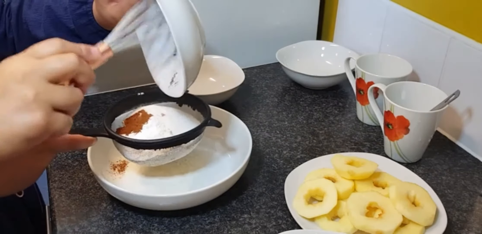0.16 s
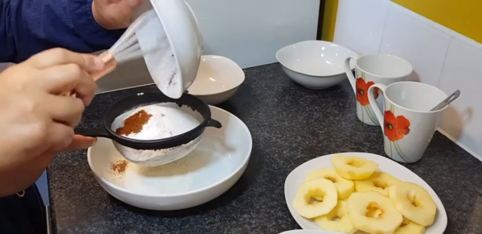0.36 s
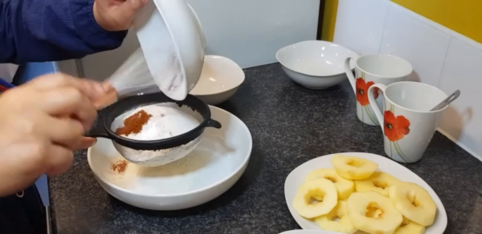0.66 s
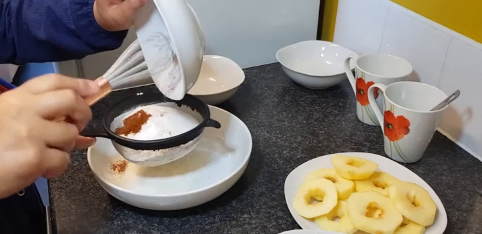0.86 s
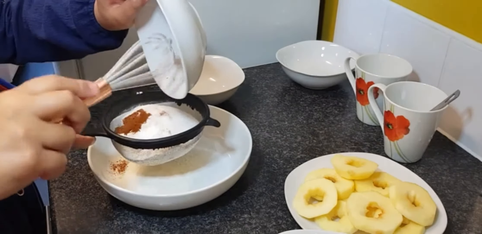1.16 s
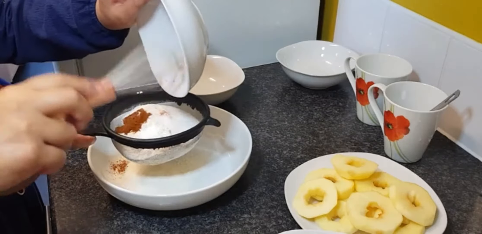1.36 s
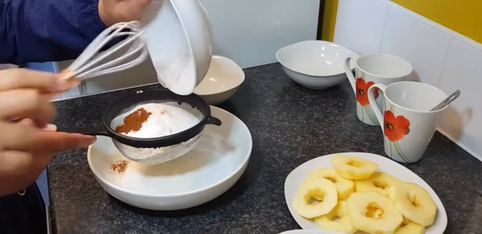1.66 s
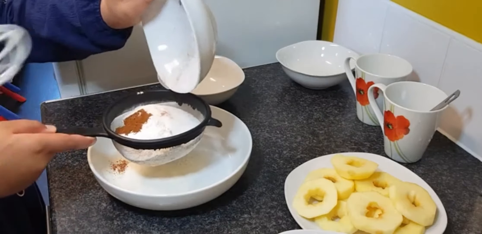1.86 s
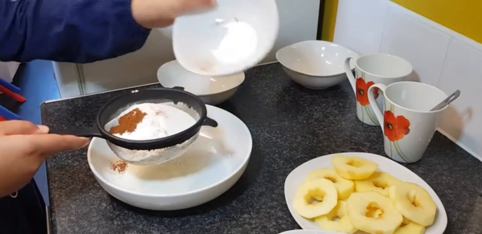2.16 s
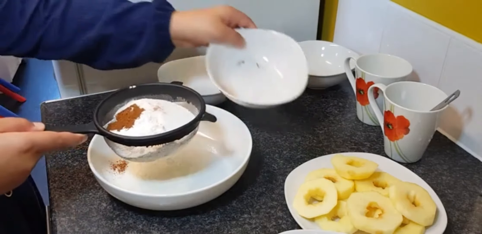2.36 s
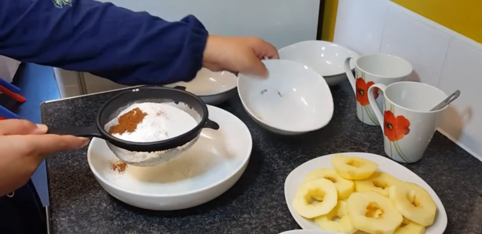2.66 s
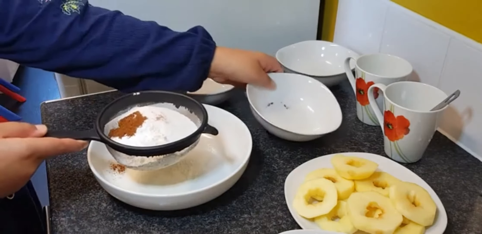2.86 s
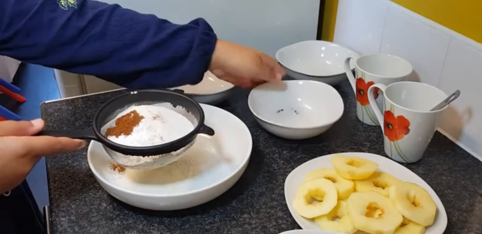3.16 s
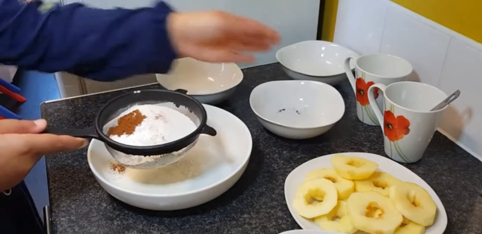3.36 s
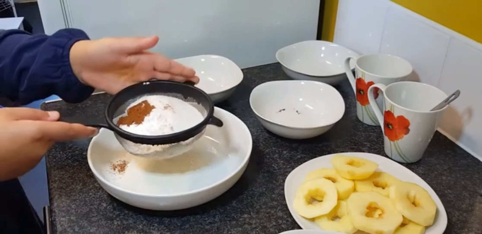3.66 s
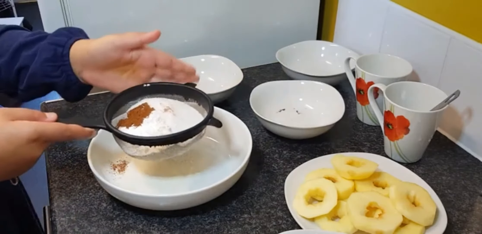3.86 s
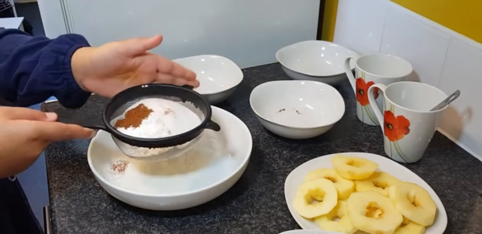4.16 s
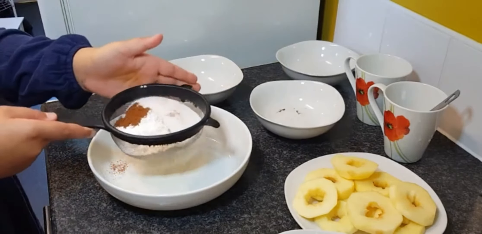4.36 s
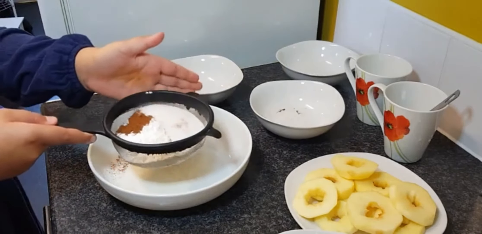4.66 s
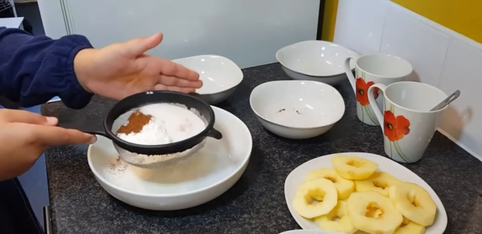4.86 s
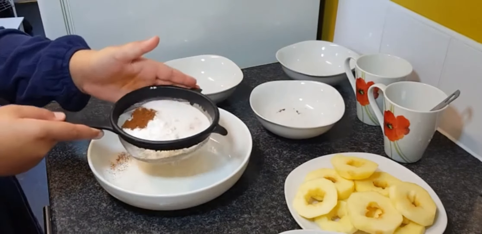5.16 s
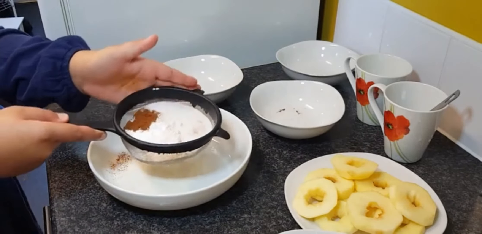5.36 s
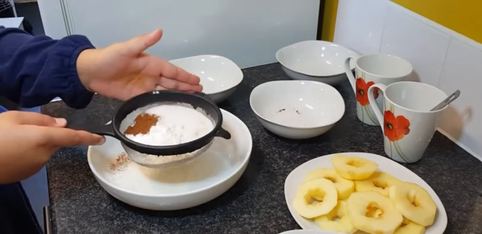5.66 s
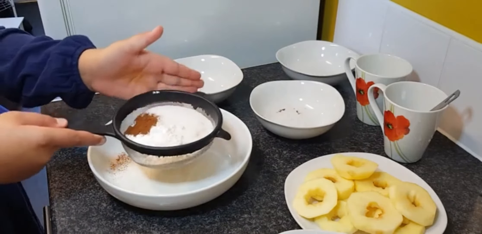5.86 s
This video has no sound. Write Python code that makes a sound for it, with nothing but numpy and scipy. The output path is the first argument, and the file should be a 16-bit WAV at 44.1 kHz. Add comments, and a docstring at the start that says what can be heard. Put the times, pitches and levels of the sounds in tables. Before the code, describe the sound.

A fan and appliances hum quietly and steadily in a tiled kitchen, heard through stereo microphones. From about 0.4 to 1.5 seconds a wire whisk taps a hand-held ceramic bowl eight times in quick, even succession, the first very faint. Each tap is a bright wiry rattle with a short, damped ring. At about 2.8 seconds the bowl meets the worktop with a loud knock, a little clatter and a low boom. Around 3.1 to 3.3 seconds it rocks to rest in three fast knocks and rings briefly, with a short room echo. The overall level dips slightly after the knocks. A faint low hum swells from 3.4 seconds and slowly fades. Between 4.3 and 6 seconds a hand softly pats a flour sieve five times, giving thin, high puffs of hiss that grow slightly stronger toward the end.

```python
"""Over the hum of a fan and appliances, a wire whisk taps a hand-held ceramic bowl eight times.
The bowl is set down on the worktop, which booms under one knock and a three-fold rock. A low hum
swells and fades, and a hand softly pats a flour sieve. Heard from a stereo pair of microphones in a
tiled kitchen; the recorder turns its gain down at the knocks and waits before it recovers."""
import sys
import numpy as np
from scipy import signal
from scipy.fft import rfft, irfft
from scipy.io import wavfile
from scipy.ndimage import uniform_filter1d, minimum_filter1d

SR = 44100
rng = np.random.default_rng(int(sys.argv[2]) if len(sys.argv) > 2 else 0)


def dump(signal):
    """Clip the signal to [-1, 1] and save it as 16-bit WAV at the path in sys.argv[1]."""
    limited = np.clip(np.atleast_2d(signal).T, -1, 1)
    pcm = np.round(limited * 32767).astype(np.int16)
    wavfile.write(sys.argv[1], SR, pcm)


N = 265482


def gain_of(db):
    """Turns dB into an amplitude factor."""
    return 10 ** (np.asarray(db) / 20)


def unit_rms(x):
    """Scales to rms 1."""
    return x / np.sqrt(np.mean(x ** 2) + 1e-20)


def curve_at(points, hz):
    """Reads (frequency, value) points on a log-frequency axis."""
    point_hz, value = np.transpose(points)
    return np.interp(np.log(hz + 1), np.log(point_hz + 1), value)


def add(mix, start_s, sound):
    """Mixes a sound in at its start time."""
    part = mix[..., round(start_s * SR):][..., :sound.shape[-1]]
    part += sound[..., :part.shape[-1]]


def mic_spectra(hz, frames):
    """Random spectra for two microphones that agree in the bass only."""
    # likeness of left and right: (frequency [Hz], correlation [-1..1])
    likeness = [(60, 0.89), (180, 0.96), (550, 0.56), (1650, 0.041), (4970, -0.11), (15000, 0.14)]
    alike = np.clip(curve_at(likeness, hz), -1, 1)[:, None]
    a, b, c, d = rng.standard_normal((frames, len(hz), 4)).T
    left, unrelated = a + 1j * b, c + 1j * d
    return np.array([left, alike * left + np.sqrt(1 - alike ** 2) * unrelated])


def burst(spectrum, rise_s, t60, tilt_db=0.):
    """Coloured noise that rises and dies away; the tilt is in dB per octave."""
    t, hz = np.arange(8192) / SR, np.fft.rfftfreq(8192, 1 / SR)
    colour = gain_of(curve_at(spectrum, hz) + tilt_db * np.log2(np.maximum(hz, 100) / 1000))
    noise = unit_rms(irfft(mic_spectra(hz, 1)[..., 0] * colour))
    return noise * (1 - np.exp(-t / rise_s)) * gain_of(-60 * t / t60)


def ring(modes, rise_s):
    """Modes build up and die away; the higher ones differ more in phase between the microphones."""
    hz, db, t60 = np.transpose(modes)[:, :, None]
    t = np.arange(round(min(1.2 * t60.max(), 1) * SR)) / SR
    common, apart = rng.uniform(-1, 1, (2, len(hz), 1))
    phase = np.pi * common + np.minimum(hz / 700, 1.15) * np.array([apart, -apart])
    swell = 1 - np.exp(-t / (rise_s + 0.13 / hz))
    return (swell * gain_of(db - 60 * t / t60) * np.sin(2 * np.pi * hz * t + phase)).sum(1)


def room_tone():
    """Fan and appliances resonate in a bed of drifting noise; a low drone swells and sinks."""
    # noise bed of the room: (frequency [Hz], relative density [dB])
    bed = [(20, -18), (62, -16), (130, -14.5), (280, -17), (560, -21), (1000, -27.5), (1300, -25),
           (2000, -21), (2400, -34), (3200, -35.5), (5000, -33), (7000, -31), (9200, -29.5), (12000, -30.5),
           (14000, -33.5), (15700, -32)]
    # fan and appliance resonances: (frequency [Hz], width [Hz], height over the bed [dB])
    hums = [(48, 10, 8), (175, 14, 8), (220, 14, 12), (345, 14, 11), (1430, 80, 5), (1630, 120, 9),
            (1900, 150, 8), (3500, 250, 9), (4150, 500, 10), (5600, 600, 4), (8200, 1200, 6),
            (14800, 600, 4), (6460, 140, 15), (9730, 70, 9), (10960, 220, 12), (15700, 80, 6)]
    # course of the drone near 100 Hz: (time [s], level [dB])
    drone_levels = [(0, -63), (.3, -51.5), (.85, -53), (1.0, -58), (2.699, -57), (3.75, -46), (4.2, -53.5),
                    (5.5, -52.5), (5.93, -49.5), (6.02, -51)]
    frames, hz = N // 1024 + 5, np.fft.rfftfreq(4096, 1 / SR)

    def noise(db):
        spectra = mic_spectra(hz, frames) * gain_of(db)
        return unit_rms(signal.istft(spectra, nperseg=4096, noverlap=3072)[1][:, :N])

    drift = uniform_filter1d(rng.standard_normal((frames, len(hz))), size=3, axis=0)
    patches_db = 1.8 * unit_rms(uniform_filter1d(drift, size=15, axis=1)).T
    hums_db = sum(db / (1 + (2 * (hz - centre) / width) ** 2) for centre, width, db in hums)
    air = noise((curve_at(bed, hz) + hums_db)[:, None] + patches_db)
    drone = noise(-3.0 * ((hz[:, None] - 101) / 7) ** 2)
    drone_db = np.interp(np.arange(N) / SR, *np.transpose(drone_levels))
    return gain_of(-49) * air + gain_of(drone_db) * drone


def wire_rattle(hard_db, rise_s, t60):
    """Wires land one by one, so the noise jumps in level; a harder tap is brighter."""
    # clash of the wires: (frequency [Hz], relative density [dB])
    spectrum = [(300, -38), (900, 1), (1500, -0.5), (2500, 3), (3300, -2.5), (4300, 0.5), (5500, -5.5),
                (7000, -8), (10000, -8), (15700, 0.5)]
    jumps = gain_of(4.5 * np.repeat(rng.standard_normal(128), 64))
    grain = unit_rms(uniform_filter1d(jumps, size=12))
    return burst(spectrum, rise_s, t60, tilt_db=0.056 * hard_db) * grain


def bowl_ring(family_db, grip_db_per_s, rise_s):
    """The ceramic rings and a gripping hand speeds its decay; families given no level stay silent."""
    # five mode families, low to high, the last from the foot:
    # (frequency [Hz], relative level [dB], t60 standing free [s])
    families = [
        [(1040, -6, .2), (1128, -4, .8), (1167, 0, 1.0)],
        [(2406, -3, .25), (2449, -4, .25), (2492, 0, .45), (2610, -6, .15), (2300, -8, .15)],
        [(4199, -3, .35), (4285, 0, .35), (4400, -8, .15), (4650, -12, .3)],
        [(6200, -3, .15), (6310, 0, .2)],
        [(9800, -2, .2), (9950, 0, .2), (10150, -2, .2)],
    ]
    modes = [(hz, db + lift_db, 60 / (60 / t60 + grip_db_per_s))
             for family, lift_db in zip(families, family_db) for hz, db, t60 in family]
    return ring(modes, rise_s)


def whisk_taps():
    """A first wire lands and the rest trail it; both rattle and ring the held bowl."""
    # whisk on bowl: (time [s], strength [dB], place [0 wall..1 rim], hardness [dB], trailing lag [s])
    taps = [(0.4078, -39.5, 0.5, -33, .005), (0.583, -25, 0.55, 1, 0.0053),
            (0.7511, -25, 0.36, -5.5, 0.0064), (0.891, -23.5, 0.15, 3.5, 0.0067),
            (1.0369, -22.5, 0.46, -2.5, 0.009), (1.2019, -23.5, 0.87, -3, .005),
            (1.3744, -26.5, 0.64, -8, 0.0034), (1.5228, -29.5, 0.72, -3.5, .004)]
    # drive of the four lower families: (offset at wall [dB], change at rim [dB], hardness share [ratio])
    tap_drive = [(-31, 26, 0.), (-1.5, -3, 0.15), (-6.5, -3.5, 0.91), (-16, 0, 0.93)]
    wall_db, rim_db, hard_share = np.transpose(tap_drive)
    pan = gain_of([[-1], [1]])  # the bowl rings slightly to the right
    out = np.zeros((2, N))
    for s, db, place, hard_db, lag in taps:
        family_db = db + wall_db + rim_db * place + hard_share * hard_db
        add(out, s, gain_of(db - 1.5) * wire_rattle(hard_db, rise_s=0.00026, t60=0.04))
        add(out, s + lag, gain_of(db - 6.5) * wire_rattle(hard_db, rise_s=0.00077, t60=0.092))
        add(out, s, pan * bowl_ring(family_db - 3, grip_db_per_s=530, rise_s=0.0018))
        add(out, s + lag, pan * bowl_ring(family_db - 2, grip_db_per_s=530, rise_s=0.00049))
    return out


def kitchen_echo(sound):
    """The tiled room answers after 4 ms with a diffuse tail, each band dying at its own speed."""
    # reverberation: (frequency [Hz], t60 [s], relative level [dB])
    bands = [(59, 0.44, 3), (193, 0.46, -9.5), (930, 0.36, -2), (3020, 0.34, 0), (8000, 0.3, 5),
             (14900, 0.14, 4.5)]
    band_hz, t60, db = np.transpose(bands)
    hz, t = np.fft.rfftfreq(512, 1 / SR), np.arange(300) * 128 / SR
    start_db = curve_at(np.c_[band_hz, db], hz)[:, None]
    fade_db = start_db - 60 * t / curve_at(np.c_[band_hz, t60], hz)[:, None]
    tail = signal.istft(mic_spectra(hz, len(t)) * gain_of(fade_db), nperseg=512, noverlap=384)[1]
    tail = np.pad(tail / np.linalg.norm(tail[0]), ((0, 0), (180, 0)))
    return signal.fftconvolve(sound.mean(0)[None], tail, axes=1)[:, :N]


def bowl_set_down():
    """Each contact gives a clack, a longer clatter, a flat blow, a worktop boom and a faint bowl ring."""
    # bowl on worktop: (time [s], strength [dB], flatness [dB], rim and foot ring [dB], grip [dB/s])
    contacts = [(2.767, -9.5, 7.5, -20, 340.5), (2.824, -23.5, 8, -14, 240), (2.852, -20, -16, -8, 120.5),
                (3.141, -15.5, -1, 2.5, 73), (3.191, -11.5, -1, -4, 90), (3.245, -11.5, -5, -5, 7)]
    # clack and clatter: (frequency [Hz], relative density [dB])
    thud = [(60, -22), (150, -9.5), (313, -24.5), (459, -11), (829, -9), (1150, -8.5), (2000, -19.5),
            (3570, -33), (8680, -48), (15700, -48)]
    # the foot landing flat: (frequency [Hz], relative density [dB])
    foot = [(150, -32.5), (280, 3), (450, 6.5), (650, -8), (1500, -43.5), (15700, -76)]
    # modes of the worktop under the knocks: (frequency [Hz], relative level [dB], nominal t60 [s])
    worktop = [(75.5, 0, .26), (94, -7, .2), (115, -10, .2), (145, -7, .2), (218, -8, .25), (290, -14, .15),
               (373, -12, .12), (425, -11, .15), (478, -9, .2), (651, -14, .2), (830, -15, .2),
               (915, -16, .2), (1043, -12, .2), (1220, -12, .1)]
    # drive of each bowl family: (offset from strength [dB], share of rim and foot ring [ratio])
    knock_drive = [(-13, 0.86), (-27, .1), (-43, .1), (-29.5, .3), (-28, 0.55)]
    offset_db, ring_share = np.transpose(knock_drive)
    worktop_boom = np.multiply(worktop, [1, 1, .9])  # a short low boom
    out = np.zeros((2, N))
    for s, db, flat_db, ring_db, grip in contacts:
        tilt_db = 0.5 * min(db + 9, 0) + 0.13 * max(ring_db, 0)  # soft blows dull, ringing ones brighten
        boom_db = db + 1.7 + .3 * flat_db  # a flat landing drives the worktop harder
        add(out, s, gain_of(db + 7) * burst(thud, rise_s=0.001, t60=0.037, tilt_db=tilt_db + 0.25))
        add(out, s, gain_of(db + 1.5) * burst(thud, rise_s=0.0033, t60=0.18, tilt_db=tilt_db + 0.83))
        add(out, s, gain_of(db + flat_db) * burst(foot, rise_s=0.00069, t60=0.034))
        add(out, s, gain_of(boom_db) * ring(worktop_boom, rise_s=0.0012))
        add(out, s, bowl_ring(db + offset_db + ring_share * ring_db, grip, rise_s=.0015))
    return out


def low_hum():
    """A low hum near 80 Hz swells after the knocks and fades: a wavering tone and its weaker octave."""
    pitch_hz, start_s, rise_s, fade_db_per_s = 80.5, 3.4, 0.26, 7.5
    t = np.arange(N) / SR
    waver = unit_rms(uniform_filter1d(rng.standard_normal(N), size=9000))
    cycles = pitch_hz * t + .07 * waver
    tone = np.sin(2 * np.pi * cycles) + gain_of(-8) * np.sin(4 * np.pi * cycles)
    since = t - start_s
    return np.clip(since / rise_s, 0, 1) * gain_of(-50 - fade_db_per_s * since) * unit_rms(tone)


def sieve_pats():
    """Soft pats shake thin puffs of flour through the mesh."""
    # hand on sieve: (time [s], puff strength [dB])
    pats = [(4.2694, -51), (4.7094, -44), (5.3268, -46), (5.738, -39), (5.9494, -38)]
    hiss = [(3000, -26), (9000, -10.5), (15000, 2)]  # (frequency [Hz], relative density [dB])
    out = np.zeros((2, N))
    for s, db in pats:
        add(out, s, gain_of(db - 7) * burst(hiss, rise_s=.004, t60=0.25))
    return out


def scene():
    """At the microphones: taps and knocks with their echo, the sieve, room tone and the low hum."""
    # where the bowl lands in the stereo image: (frequency [Hz], left over right [dB])
    balance = [(60, -3), (180, -1.5), (550, 3), (1650, 2), (4970, 2.0), (15000, -4)]
    taps, knocks = whisk_taps(), bowl_set_down()
    knocks = knocks + kitchen_echo(gain_of(-2.5) * knocks)
    # the worktop is too small to radiate below its lowest mode
    knocks = signal.sosfilt(signal.butter(6, 60, "high", fs=SR, output="sos"), knocks)
    balance_db = curve_at(balance, np.fft.rfftfreq(N, 1 / SR))
    knocks = irfft(rfft(knocks) * gain_of(np.outer([.5, -.5], balance_db)), N)
    taps = taps + kitchen_echo(gain_of(-2.0) * taps)
    return taps + knocks + sieve_pats() + room_tone() + low_hum()


def record(dry):
    """The recorder drops its gain on a loud sound, holds, then recovers; it cuts the highest treble."""
    threshold_db, max_cut_db, recovery_db_per_s, hold_s, top_hz = -17, 5.5, 9.8, 2.2, 15770
    power = uniform_filter1d((dry ** 2).mean(0), size=400)
    over_db = np.clip(10 * np.log10(abs(power) + 1e-12) - threshold_db, 0, max_cut_db)
    hold = round(hold_s * SR)
    held_db = -minimum_filter1d(-over_db, size=hold, origin=(hold - 1) // 2, mode="nearest")
    recovery_db = np.arange(N) * recovery_db_per_s / SR
    cut_db = np.maximum.accumulate(held_db + recovery_db) - recovery_db
    lowpass = signal.firwin(1023, top_hz, window=("kaiser", 9), fs=SR)
    return signal.oaconvolve(dry / gain_of(cut_db), lowpass[None], "same")


dry = scene()
out = record(dry)
dump(out)
```